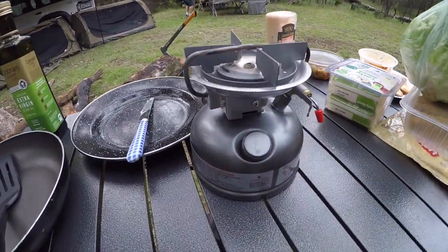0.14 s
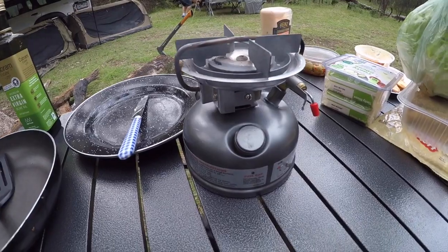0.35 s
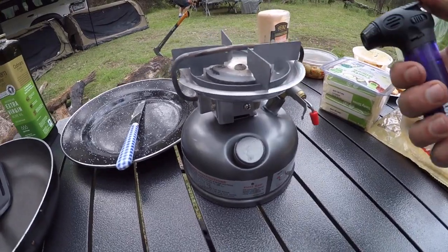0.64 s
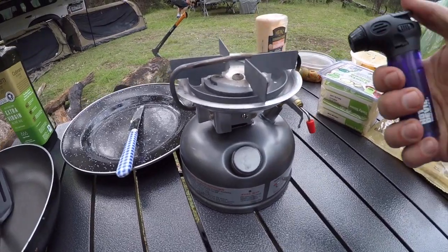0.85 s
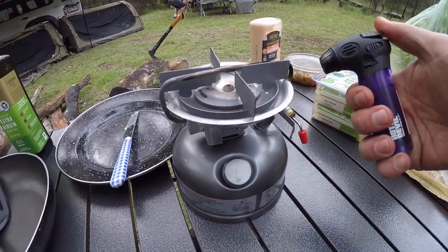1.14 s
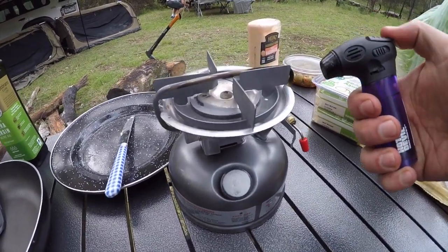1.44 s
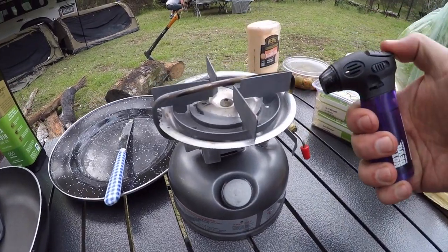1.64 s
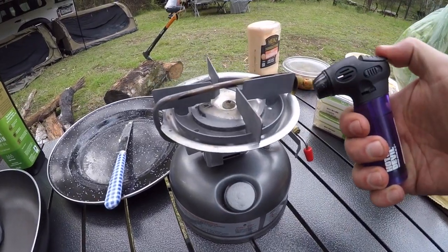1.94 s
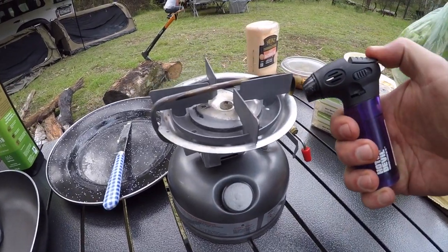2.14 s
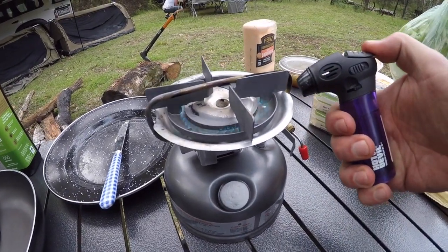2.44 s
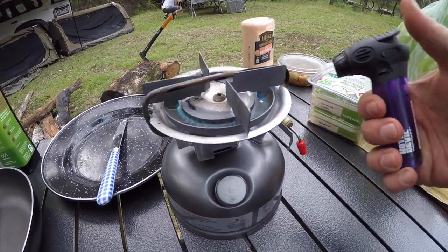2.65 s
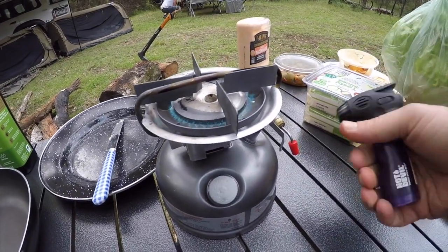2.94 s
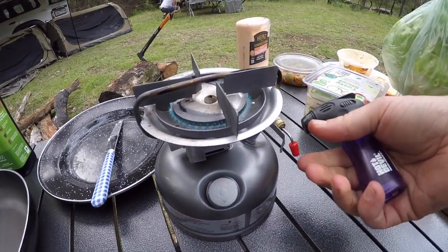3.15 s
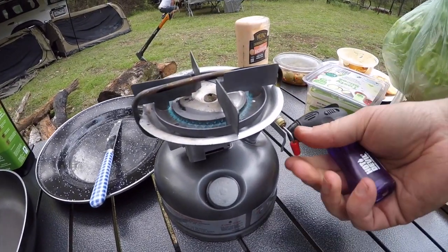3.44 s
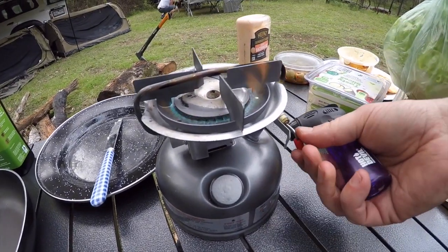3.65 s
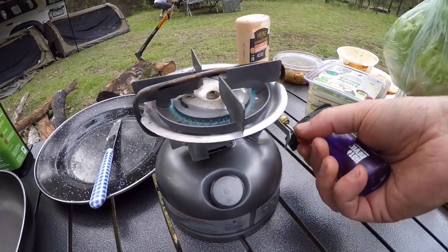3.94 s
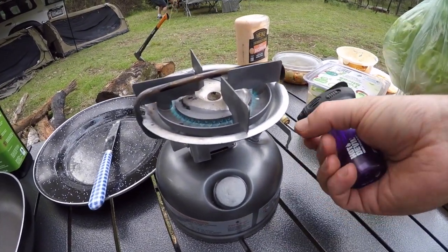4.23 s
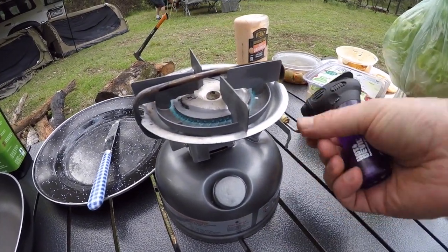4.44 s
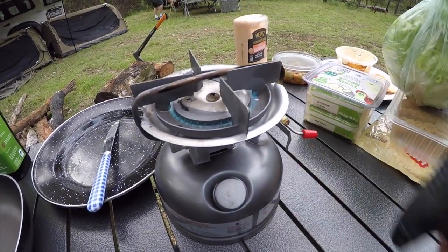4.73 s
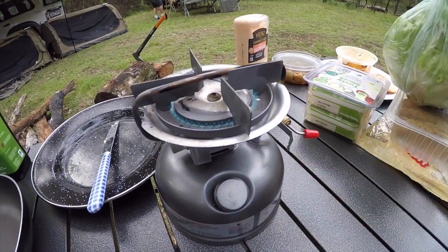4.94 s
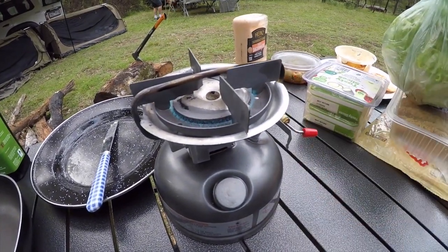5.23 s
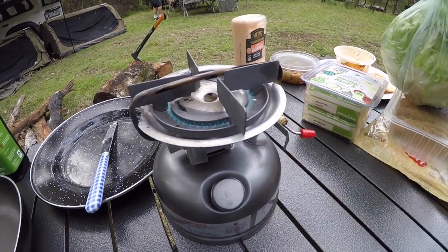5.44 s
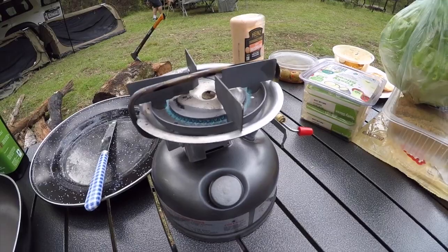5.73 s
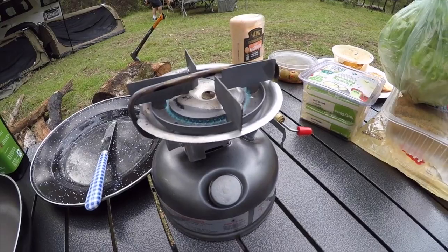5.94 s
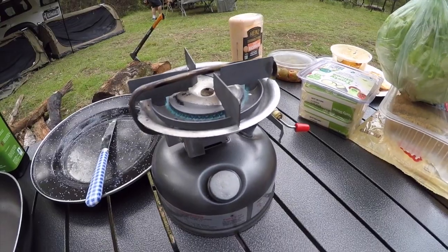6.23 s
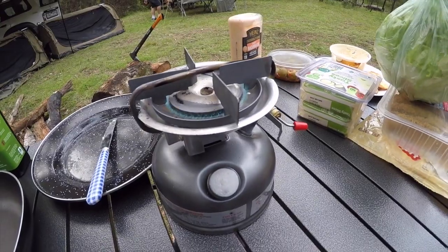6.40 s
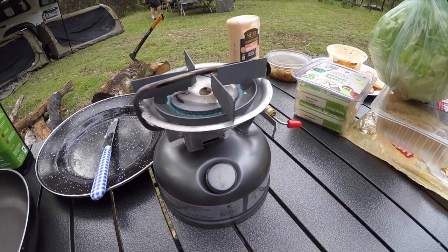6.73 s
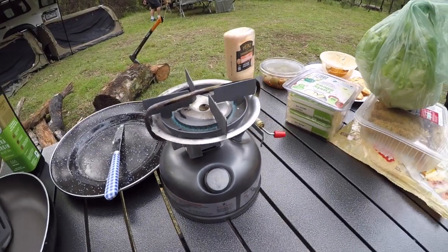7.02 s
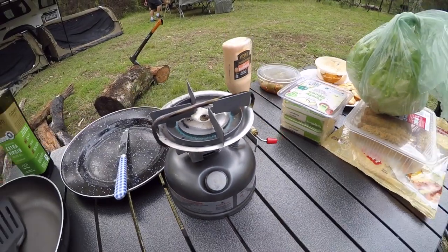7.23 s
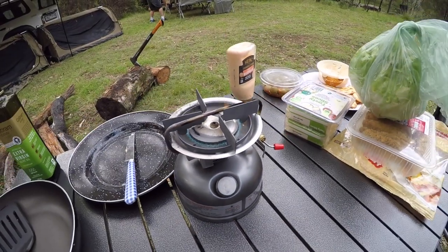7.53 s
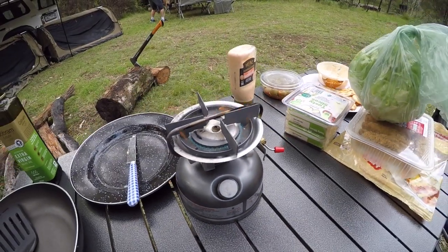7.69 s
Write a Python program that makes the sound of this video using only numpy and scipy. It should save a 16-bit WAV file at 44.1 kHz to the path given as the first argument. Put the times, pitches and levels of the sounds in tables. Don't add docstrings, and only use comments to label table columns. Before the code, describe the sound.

Outdoors, close to a small gas stove, a bright hiss with a wandering whistle around 5.5 kHz is present from the start. Fingers rumble low and lumpy on the sealed camera housing, with a soft touch at 0.1 s. A lighter trigger creaks and snaps hard at 0.97 s, weakly at 1.19, loudly with a thump and faint metallic ring at 1.44, and dully at 2.57; the background dips after the loud snaps. From about 1.1 s a hollow gas note swells. Soft suction pops at 2.3-2.4 s mark ignition, then a low flickering roar joins the hiss, whose whistle weakens and fizz sputters. Faint thin bird notes sound at 3.9, 4.4 and 4.65 s. Burning and grip rumble continue, with a stronger jolt near 6.7 s. From 6.5 s the roar recedes as the camera backs away; a dull thud at 7.3 s and taps at 7.5-7.8 s close it.

```python
import sys
import numpy as np
from scipy import signal
from scipy.fft import rfft, irfft, next_fast_len
from scipy.io import wavfile
from scipy.ndimage import uniform_filter1d, map_coordinates

SR = 44100
rng = np.random.default_rng(int(sys.argv[2]) if len(sys.argv) > 2 else 0)


def int16_out(signal):
    q = np.round(np.clip(np.atleast_2d(signal).T, -1, 1) * 32767)
    wavfile.write(sys.argv[1], SR, q.astype(np.int16))


def volts_from_db(level):
    exponent = np.asarray(level, float) / 20
    return 10 ** exponent


N = 346626

# (time [s], closeness [dB], whistle level [dB], whistle pitch [Hz])
NOZZLE = [(0, -38, -27, 5410), (0.37, -37, -23.5, 5360), (0.6, -37, -32, 5640), (0.9, -37, -28, 5480),
          (1.05, -36.5, -24, 5470), (1.3, -37, -25.5, 5310), (1.85, -37, -34, 5570), (2.21, -37, -25, 5690),
          (2.5, -38.5, -38.5, 5500), (2.64, -39.5, -25.5, 5660), (3.0, -39.5, -42.5, 5500),
          (3.3, -43, -32, 5400), (3.85, -40.5, -35, 5220), (4.5, -43, -34, 5600), (5.5, -41.5, -35.5, 5700),
          (6.5, -40.5, -58, 5030), (6.8, -42.5, -35, 5500), (7.86, -45.5, -48, 5700)]
# (frequency [Hz], level [dB])
BODY_NEAR = [(900, -76), (1150, -19), (1350, -1), (1650, -8), (1950, -4.5), (3100, -8.5), (3400, -8),
             (3900, -10), (5600, -4.5), (7200, -23.5), (9360, -53), (15800, -120)]
BODY_FAR = [(1100, -17.5), (1400, 2), (1780, -9), (2050, -3), (2350, -3.5), (2600, -9.5), (3100, -6.5),
            (3300, -12.5), (3700, -7.5), (4300, -11), (4750, -1.5), (6000, -4.5), (7200, -22),
            (15800, -120)]
FAR_DB = 3.5
# (from [s], to [s], extra path [ms], strength [0-1])
ECHO = [
    (-1, 1.5, .75, .45),
    (2.9, 4.25, 1.3, .35),
    (4.3, 7.05, 1.06, .33),
    (7.1, 9, .9, .2),
]
ECHO_FROM_HZ, POSE_FADE_S = 3000, 0.14
# (time [s], level [dB], half length [s])
GUSTS = [(.41, 3.5, 0.025), (1.2, 3.5, 0.081), (2.4, 0.5, 0.041), (2.75, 6, 0.012), (2.95, 5, 0.095),
         (3.22, -4, 0.069), (3.6, -3.5, 0.17), (4.2, 1.5, 0.036), (5.4, -2, 0.087), (6.2, 3, .1),
         (6.66, -4, 0.046), (6.77, 5.5, 0.033), (7.05, -2.5, .06), (7.16, -3, 0.071), (7.28, 3.5, 0.023),
         (7.42, -2, 0.14), (7.62, -3.5, 0.055), (7.74, 3.5, 0.045)]
GUST_HZ, GUST_WIDTH_HZ = 5500, 610
# (time [s], centre [Hz], level [dB], half length [s])
SHADES = [(.08, 7235, 5, 0.087), (.29, 2110, 6, 0.18), (.745, 2350, 10, .03), (0.733, 4740, 4, .06),
          (.77, 5300, 2.5, 0.026), (.88, 5450, 4.5, 0.023), (1.61, 2200, -7, 0.13), (2.01, 6960, -10, 0.18),
          (2.19, 9990, -1, .1), (2.33, 5860, 6, 0.068), (2.55, 3580, 8, 0.083), (2.638, 4950, 7.5, .04),
          (2.75, 5600, -1.5, 0.032), (3.395, 5450, 4, .05), (3.65, 2300, -10, 0.17), (3.71, 3620, -3, .1),
          (3.78, 6460, -1, .08), (3.98, 6760, 3.5, .08), (4.2, 3530, 6, 0.091), (4.22, 5500, 3, 0.043),
          (4.93, 8400, -8, .12), (4.95, 4730, 3.5, 0.075), (5.13, 2860, -9, 0.14), (5.175, 5600, 3, .07),
          (5.45, 5170, -4, .08), (5.67, 4830, 6, 0.075), (5.82, 6440, -8, .08), (5.86, 9100, -6, 0.15),
          (6.47, 8010, 10, 0.065), (6.5, 4660, -3.5, 0.26), (6.7, 1400, -2.5, 0.5), (6.1, 2500, 0, .15),
          (7.1, 2380, 6, 0.19), (2.9, 5500, -3, 0.067), (6.69, 8050, -6, 0.079), (6.95, 3800, 7, .12),
          (6.8, 2700, -3, .1), (5.5, 4350, 2, 0.98), (1.3, 9000, 2, .1), (1.55, 650, 3, .1),
          (7.05, 9260, -1, 0.11), (7.076, 5300, 6.5, .04), (7.24, 4740, -6, 0.11), (7.3, 5340, 2.5, 0.035),
          (7.798, 5700, 5, .06)]
SHADE_WIDTH = .07
# (frequency [Hz], level [dB])
TUBE = [(330, -33), (560, -7.5), (764, 2.5), (890, 2), (1050, -3.5), (1150, -20), (1500, 2.5), (2530, -120)]
HOLLOW_DB, HOLLOW_SINKS_DB_PER_S = -59.5, -1.2
TORCH_S, TORCH_RISE_S, TORCH_DB = 1.07, .95, 7.5
# (frequency [Hz], density [dB per Hz])
FIZZ_COLD = [(3820, -6), (6500, 3), (6740, -1), (7240, -7), (7760, -8), (8990, -13), (10100, -10.5),
             (11000, -22), (12500, -18.5), (13600, -25), (14100, -21), (14700, -17), (15400, -19)]
FIZZ_LIT = [(3820, -77), (6500, -2.5), (7300, -11), (7870, -9.5), (9090, -13.5), (10000, -10.5),
            (10900, -19.5), (12300, -15), (13400, -25), (14700, -15.5), (15400, -19)]
FIZZ_DB, FIZZ_GROWS = -47, 0.92
# (time [s], level [dB], half length [s])
GLINTS = [
    (1.0, 4, 0.18),
    (2.36, 0, .15),
    (3.3, 2.5, .1),
    (4.005, 1, 0.25),
    (4.946, 6, 0.05),
    (5.595, 2.5, 0.09),
    (6.106, 1.5, 0.23),
    (6.9, 5, 0.084),
]
# (time [s], level [dB], half length [s])
SHEEN = [
    (.55, 8.5, 0.21),
    (1.0, -7, .15),
    (2.2, 2, .2),
    (3.35, 6, .1),
    (3.92, 6, .2),
    (5.1, -3, .4),
    (5.95, 3, .05),
    (6.65, -6, .08),
    (7.1, -2.5, .15),
]
SHEEN_HZ, SHEEN_WIDTH_HZ = 14700, 1200
CUP_S, CUP_HALF_S, CUP_HZ, CUP_WIDTH_HZ, CUP_DB = 4.07, 0.6, 7530, 1200, 6.5
# (frequency [Hz], density [dB per Hz])
APART = [(5410, -43), (9200, -28), (10100, -25), (11000, -28), (11600, -17), (12300, -1), (13700, -14),
         (15400, 4.5)]

# (frequency [Hz], density [dB per Hz])
GRIP = [(11, -38), (18, -3.5), (58, -4.5), (76, -8), (124, -18.5), (165, -22.5), (205, -26.5), (315, -35),
        (353, -34), (391, -31.5), (560, -52.5), (730, -75), (1230, -120)]
GRIP_DB, GRIP_LOOSENS_S, GRIP_DROP_DB = -27, 2.66, -1
SKIN_HZ, SKIN_SWING = 110, 0.71
# (time [s], level [dB])
JOLTS = [(.13, 3.5), (.85, 7), (.95, 0.5), (1.0, 9), (1.1, -2), (1.3, -5), (1.44, 6.5), (1.8, -3.5),
         (1.92, 5), (2.17, 1), (2.25, 4), (2.41, 2.5), (2.56, 0), (2.87, 7), (3.35, 4.5), (3.74, 0),
         (4.09, 7.5), (4.27, 3.5), (4.42, 8.5), (4.62, 0.5), (4.79, 1), (5.17, -5), (5.32, 5), (5.56, 8),
         (5.67, -7), (5.98, 6), (6.5, 1), (6.74, 11.5), (7.1, -1), (7.38, 7), (7.71, 3), (7.86, -3)]
JOLT_RISE_S, JOLT_FALL_S = 0.051, 0.058
# (time [s], length [s], pitch [Hz], level [dB], glide [Hz per s])
TREMOR = [
    (0.179, 0.35, 48.64, -25, -1.5),
    (0.944, 0.53, 66.5, -28, 1),
    (2.102, 0.34, 50.6, -26.5, 121.5),
    (4.795, 0.39, 49.1, -32, -6),
    (5.471, 0.34, 50.6, -25.5, -11),
    (5.846, 0.364, 49.3, -25, 0.5),
    (6.682, 0.22, 49.2, -27, -2),
    (7.453, 0.52, 48.8, -32, -1),
    (4.17, .22, 61.9, -28, 0),
]
STRAIN_RISE_S, STRAIN_SAG_DB_PER_S = 0.083, -11

# (time [s], peak [dB], thud [dB])
KNOCKS = [
    (0.087, -28.5, 6),
    (7.34, -29.5, 17),
    (7.5065, -14.5, -22),
    (7.664, -14.5, -15.5),
    (7.801, -22.5, -8),
    (7.824, -25, -8),
]
# (frequency [Hz], width [Hz], level [dB])
SHELL = [(276, 93, -3), (389, 38, 6), (720, 82, -4), (970, 170, -7)]
FINGER_S = 0.00078
# (time [s], level [dB], half width [s])
PUSHES = [
    (.99, -10.5, 0.0077),
    (7.5095, -26, 0.004),
    (7.673, -15.5, 0.0034),
]

# (time [s], level [dB], pitch factor, upper modes [dB])
SLIPS = [(.944, -27, 1, -6), (.9482, -22, 1, -8), (.9535, -20, 1.0, 7), (.9575, -19, .99, -2),
         (.9605, -13, 1, -2), (.972, -22, 1, 0), (1.1885, -34, 1, -4), (1.412, -34, 1, 10),
         (1.416, -27, .98, -2), (1.4222, -24, 1, 8), (1.4268, -16.5, .97, -3), (1.4305, -23, .96, -4),
         (1.4335, -17, 1, -3), (1.441, -27, .97, -6), (2.5685, -30, 1.07, -6)]
TICK_DB = -3
# (frequency [Hz], level [dB], t60 [s])
LIGHTER = [(1800, -9, .0045), (4300, -6, .016), (4650, -12, .012), (5267, 3, .02), (5950, -7, .015),
           (7300, -12, .018), (8380, -14, .025), (9000, -12, .03), (10100, -19, .015)]
UPPER_HZ = 6500
# (time [s], crack [dB], thump [dB], pitch factor, barrel [dB])
SNAPS = [
    (0.9657, -5.5, -43, 0.995, -22),
    (1.1902, -15, -42, 1.04, -18),
    (1.435, -6.5, -4, 1.02, -30),
    (2.5719, -17, -30, 1.07, -18),
]
# (top [Hz], lift of the low part [dB], ring [dB], ring length factor)
SNAP_COLOUR = [
    (15000, -14, -1, 1),
    (8600, 17, -.5, .55),
    (15500, 12, -1, .85),
    (8800, 18, -2.5, .6),
]
LOW_PART_HZ = 1500
REBOUND_S, REBOUND_DB = .0014, -6
BARREL_HZ, BARREL_T60_S = 1780, .011
# (frequency [Hz], density [dB per Hz])
CRACK = [(350, -60), (600, -36), (1300, -24), (1700, -2), (3600, 6.5), (4600, 8), (6800, 9), (9400, 7),
         (11000, -6), (15300, -19)]
# (time [s], pitch [Hz], level [dB], t60 [s])
SPRING = [
    (1.44, 8335, -48, 0.57),
    (1.44, 8400, -48, 0.6),
]

# (time [s], level [dB], half width [s])
POPS = [
    (2.32, -4.5, 0.002),
    (2.3313, -6, 0.0038),
    (2.396, -6, 0.0021),
    (2.408, 1.5, 0.0039),
]
# (frequency [Hz], density [dB per Hz])
ROAR = [(41, -36), (70, -5.5), (139, 0), (195, 0), (233, -4), (318, -14.5), (399, -16.5), (439, -23),
        (510, -26), (560, -41), (640, -32.5), (760, -34), (1230, -120)]
FLAME_DB, RETREAT_S, RETREAT_DB_PER_S = -28, 6.54, -5
CATCH_S, SPREAD_S, SPREAD_DB = 2.305, .2, -0.5
LICK_S, LICK_HALF_S, LICK_DB = 2.155, 0.098, -14.5
# (time [s], level [dB])
FLARES = [(2.6, 7), (2.73, 7), (2.76, -8), (2.88, 2), (3.07, 6.5), (3.25, 5), (3.69, -1), (4.65, 3.5),
          (4.78, -3), (4.95, 3.5), (5.1, -0.5), (5.32, 0), (5.58, 4.5), (5.89, 2), (6.07, 2), (7.22, 7),
          (7.52, 5), (7.61, -4)]
FLARE_RISE_S, FLARE_FALL_S = 0.045, 0.014

# (time [s], length [s], pitch [Hz], level [dB])
BIRD = [
    (3.93, .2, 2960, -47),
    (4.42, .14, 3950, -51),
    (4.65, .1, 3975, -45),
]


def unit(x):
    return x / np.sqrt(np.mean(x ** 2) + 1e-20)


def along(points, hz):
    f, v = np.transpose(points)
    return np.interp(np.log(hz + 1), np.log(f + 1), v, -120, -120)


def curves(rows, t):
    s, *columns = np.transpose(rows)
    return [np.interp(t, s, column) for column in columns]


def wobble(rate):
    at = np.arange(0, N + 16, 16)
    knots = rng.standard_normal(int(N * rate / SR) + 4)
    return np.interp(np.arange(N), at, map_coordinates(knots, [at * rate / SR]))


def swells(rows, rise_s, fall_s):
    t = np.arange(0, N / SR + 1, .001)
    total = sum(db * np.exp(-((t - s) / np.where(t < s, rise_s, fall_s)) ** 2) for s, db in rows)
    return np.interp(np.arange(N) / SR, t, total)


def bumps(rows, t):
    at = np.arange(0, N / SR + 1, .002)
    return np.interp(t, at, sum(db * np.exp(-((at - s) / half) ** 2) for s, db, half in rows))


def bell(hz, centre, width):
    return np.exp(-((hz - centre) / width) ** 2)


def pressure_dips(rows, offset_db=0):
    t, out = np.arange(N) / SR, np.zeros(N)
    for s, db, half in rows:
        u2 = ((t - s) / half) ** 2
        out += volts_from_db(db + offset_db) * (2 * u2 - 1) * np.exp(-u2)
    return out


def add_at(out, start, sound):
    out[start:][:len(sound)] += sound


def filtered(x, response):
    m = next_fast_len(N + 8192)
    return irfft(rfft(x, m) * response(np.fft.rfftfreq(m, 1 / SR)), m)[..., :N]


def rush(shape_db, patchy_db, drift_db, size=1024):
    hz, t, z = signal.stft(rng.standard_normal(N), SR, nperseg=size)

    def blur(bins, frames):
        field = uniform_filter1d(rng.standard_normal(z.shape), size=bins, axis=0)
        return unit(uniform_filter1d(field, size=frames, axis=1))

    field_db = patchy_db * blur(12, 6) + drift_db * blur(5, 60)
    return unit(signal.istft(z * volts_from_db(shape_db(hz[:, None], t) + field_db), nperseg=size)[1][:N])


def shades(hz, t):
    s, centre, db, half = np.transpose(SHADES)
    over_time = db[:, None] * np.exp(-((t - s[:, None]) / half[:, None]) ** 2)
    return np.exp(-((hz / centre - 1) / SHADE_WIDTH) ** 2) @ over_time


def lit(t):
    return np.clip((t - 2.1) / 0.26, 0, 1)


def bounce_db(hz, t):
    paths = 0
    for start, end, ms, strength in ECHO:
        held = np.clip(np.minimum(t - start, end - t) / POSE_FADE_S, 0, 1)
        paths = paths + strength * held * np.exp(-2j * np.pi * hz * ms / 1000)
    bounce = paths / (1 + (ECHO_FROM_HZ / (hz + 1)) ** 4)
    return 20 * np.log10(np.abs(1 + bounce) + 1e-2)


def jet_body(closeness_db, flutter):
    def colour(hz, t):
        far = np.clip((NOZZLE[0][1] - curves(NOZZLE, t)[0]) / FAR_DB, 0, 1)
        distance_db = along(BODY_NEAR, hz) * (1 - far) + along(BODY_FAR, hz) * far
        gust_db = bumps(GUSTS, t) * bell(hz, GUST_HZ, GUST_WIDTH_HZ)
        return shades(hz, t) + distance_db + bounce_db(hz, t) + gust_db

    return volts_from_db(closeness_db + 5.0 + 0.31 * flutter) * rush(colour, patchy_db=1.24, drift_db=1.9)


def hollow_note():
    since = np.arange(N) / SR - TORCH_S
    level_db = HOLLOW_DB + TORCH_DB * np.clip(since / TORCH_RISE_S, 0, 1)
    level_db += HOLLOW_SINKS_DB_PER_S * np.clip(since - TORCH_RISE_S, 0, None)
    return volts_from_db(level_db + 1.5) * rush(lambda hz, t: along(TUBE, hz), patchy_db=1.5, drift_db=0.2)


def whistle(whistle_db, flutter):
    def band(hz, t):
        off_centre = (hz - curves(NOZZLE, t)[2]) / (330 + 400 * lit(t))
        return shades(hz, t) - 14.3 * np.log1p(off_centre ** 2)

    level_db = whistle_db - 4.5 + bumps(GUSTS, np.arange(N) / SR) + 1.2 * flutter
    return volts_from_db(level_db) * rush(band, patchy_db=2.6, drift_db=1.3)


def gas_fizz(closeness_db):
    now = np.arange(N) / SR
    level_db = FIZZ_DB + FIZZ_GROWS * (closeness_db - NOZZLE[0][1]) + bumps(GLINTS, now)
    level_db += (1.18 + 0.58 * lit(now)) * (0.46 * wobble(24) + 0.97 * wobble(50))

    def shape(hz, t):
        gas_db = along(FIZZ_COLD, hz) * (1 - lit(t)) + along(FIZZ_LIT, hz) * lit(t)
        cup_db = CUP_DB * np.exp(-((t - CUP_S) / CUP_HALF_S) ** 4) * bell(hz, CUP_HZ, CUP_WIDTH_HZ)
        sheen_db = bumps(SHEEN, t) * bell(hz, SHEEN_HZ, SHEEN_WIDTH_HZ)
        return gas_db + cup_db + sheen_db + shades(hz, t)

    return volts_from_db(level_db + 4.0) * rush(shape, patchy_db=2.0, drift_db=2.5), level_db


def jet():
    closeness_db, whistle_db, _ = curves(NOZZLE, np.arange(N) / SR)
    flutter = wobble(12)
    fizz, fizz_db = gas_fizz(closeness_db)
    gas = jet_body(closeness_db, flutter) + hollow_note() + whistle(whistle_db, flutter) + fizz
    return gas, fizz, fizz_db


def hands():
    t = np.arange(N) / SR
    rumble = unit(filtered(rng.standard_normal(N), lambda hz: volts_from_db(along(GRIP, hz))))
    skin = filtered(rumble, lambda hz: 1 / (1 + (SKIN_HZ / (hz + 1)) ** 4))
    grip_db = GRIP_DB + GRIP_DROP_DB * np.clip((t - GRIP_LOOSENS_S) / .2, 0, 1)
    swing_db = 1.07 * wobble(16) + 3.67 * wobble(6) + swells(JOLTS, JOLT_RISE_S, JOLT_FALL_S)
    moving = volts_from_db(swing_db) * (rumble - skin) + volts_from_db(SKIN_SWING * swing_db + 1.0) * skin
    out = volts_from_db(grip_db - 1.5) * moving
    for s, length, hz, db, glide in TREMOR:
        u = np.clip(t - s, 0, length)
        fade = np.clip(np.minimum(u / STRAIN_RISE_S, (length - u) / 0.022), 0, 1)
        level = volts_from_db(db + 4.0 + STRAIN_SAG_DB_PER_S * u + 0.66 * wobble(6.8))
        out += fade * level * np.sin(2 * np.pi * (hz * u + glide * u ** 2 / 2))
    return out


def shell(f):
    modes = 0
    for k, (centre, width, db) in enumerate(SHELL):
        push = 1j * f * width
        modes = modes + (-1) ** k * volts_from_db(db) * push / (centre * centre - f * f + push)
    return modes / (1 + 2j * f * FINGER_S) ** 2


def knocks():
    blows, thuds, t = np.zeros(N), np.zeros(N + SR), np.arange(SR // 8) / SR
    thud = t / 0.026 * np.exp(1 - t / 0.024) * np.sin(2 * np.pi * 68 * t)
    for s, db, thud_db in KNOCKS:
        blows[round(s * SR)] = volts_from_db(db + 34.5)
        add_at(thuds, round(s * SR), volts_from_db(db + thud_db + 3.5) * thud)
    return thuds[:N] + pressure_dips(PUSHES) + filtered(blows, shell)


def lighter_ring(t, pitch, soft_s, spread_db, upper_db=0, lasts=1):
    out = np.zeros(len(t))
    for hz, db, t60 in LIGHTER:
        level_db = db + upper_db * (hz > UPPER_HZ) + spread_db * rng.standard_normal()
        out += volts_from_db(level_db - 60 * t / (t60 * lasts)) * np.sin(2 * np.pi * (hz * pitch * t + rng.random()))
    return np.clip(t / soft_s, 0, 1) * out


def crack(db, top_hz, lift_db, noise):
    t, blow = np.arange(len(noise)) / SR, np.zeros(8192)
    add_at(blow, 512, volts_from_db(db - 6 - 60 * t / .012) * noise * np.clip(t / .0004, 0, 1))
    blow[524] += volts_from_db(db + 7)
    hz = np.fft.rfftfreq(len(blow), 1 / SR)
    colour_db = along(CRACK, hz) + lift_db / (1 + (hz / LOW_PART_HZ) ** 4)
    return irfft(rfft(blow) * volts_from_db(colour_db) / (1 + (hz / top_hz) ** 8))


def lighter():
    out, t = np.zeros(N + SR), np.arange(SR // 10) / SR
    for s, db, pitch, upper_db in SLIPS:
        i = round(s * SR)
        add_at(out, i, volts_from_db(db + 6.5) * lighter_ring(t, pitch, .0022, 2, upper_db))
        add_at(out, i - 512, crack(db + TICK_DB, 15000, -10, 0 * t))

    barrel = np.sin(2 * np.pi * BARREL_HZ * t) * np.clip(t / .001, 0, 1)
    thump = np.sin(2 * np.pi * 72 * t) * np.clip(t / 0.0112, 0, 1)
    for snap, colour in zip(SNAPS, SNAP_COLOUR):
        s, db, thump_db, pitch, barrel_db = snap
        top_hz, lift_db, ring_db, lasts = colour
        i = round(s * SR)
        level_db = db + ring_db
        add_at(out, i, volts_from_db(level_db) * lighter_ring(t, pitch, .0013, 1.5, lasts=lasts))
        rebound = volts_from_db(level_db + REBOUND_DB) * lighter_ring(t, pitch, .0008, 1.5, lasts=lasts)
        add_at(out, i + round(REBOUND_S * SR), rebound)
        add_at(out, i - 512, crack(db, top_hz, lift_db, rng.choice([-1, 1], len(t))))
        add_at(out, i, volts_from_db(barrel_db - 60 * t / BARREL_T60_S) * barrel)
        add_at(out, i, volts_from_db(thump_db - 60 * t / 0.088) * thump)

    long = np.arange(SR // 2) / SR
    for s, hz, db, t60 in SPRING:
        add_at(out, round(s * SR), volts_from_db(db - 60 * long / t60) * np.sin(2 * np.pi * hz * long))
    return out[:N]


def flame():
    t = np.arange(N) / SR
    lick = volts_from_db(LICK_DB) * np.exp(-((t - LICK_S) / LICK_HALF_S) ** 2)
    burning = np.clip((t - CATCH_S) / 0.017, 0, 1) + lick
    roar_db = FLAME_DB + SPREAD_DB * np.clip(1 - (t - CATCH_S) / SPREAD_S, 0, 1)
    roar_db += RETREAT_DB_PER_S * np.clip(t - RETREAT_S, 0, None)
    roar_db += swells(FLARES, FLARE_RISE_S, FLARE_FALL_S)
    roar = filtered(rng.standard_normal(N), lambda hz: volts_from_db(along(ROAR, hz)))
    flicker = volts_from_db(0.11 * wobble(14) + 1.67 * wobble(45))
    return pressure_dips(POPS, -8.0) + burning * volts_from_db(roar_db + 2.0) * unit(roar * flicker)


def bird():
    t, out = np.arange(N) / SR, np.zeros(N)
    for s, length, hz, db in BIRD:
        fade = np.clip(np.minimum(t - s, s + length - t) / 0.0069, 0, 1)
        out += volts_from_db(db) * fade * np.sin(2 * np.pi * hz * t)
    return out


def scene():
    gas, fizz, fizz_db = jet()
    snaps = lighter()
    mid = gas + hands() + knocks() + snaps + flame() + bird()
    own_db = fizz_db - 13.0 + .7 * bumps(SHEEN, np.arange(N) / SR)
    own = volts_from_db(own_db) * rush(lambda hz, t: along(APART, hz), patchy_db=5.0, drift_db=.8)
    side = own - 0.17 * filtered(fizz, lambda hz: hz > 11300)
    side += volts_from_db(-26) * filtered(snaps, lambda hz: hz / (hz + 1500))
    return np.array([mid + side, mid - side])


def low_pass(x):
    return signal.sosfilt(signal.butter(12, 16620, fs=SR, output="sos"), x)


def record(dry):
    t, duck_db = np.arange(N) / SR, np.zeros(N)
    for s, db, *_ in SNAPS:
        after = np.clip(t - s - .005, 0, None)
        duck_db -= max(db + 20.5, 0) * np.clip(after / 0.017, 0, 1) * np.exp(-after / 0.037)
    ducked = dry * volts_from_db(duck_db)
    rounded = ducked / (1 + np.abs(ducked / .97) ** 8) ** (1 / 8)

    def housing(hz):
        return (hz < 15330) * (1 - 0.7 * bell(hz, 575, 35))

    return low_pass(filtered(rounded, housing))


dry = scene()
out = record(dry)
int16_out(out)
```